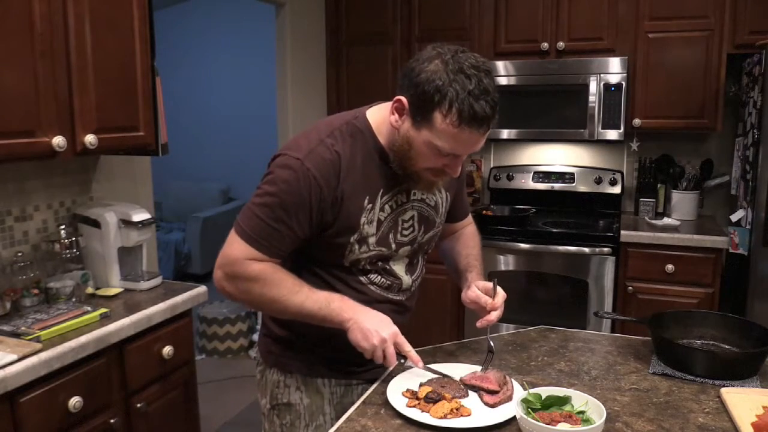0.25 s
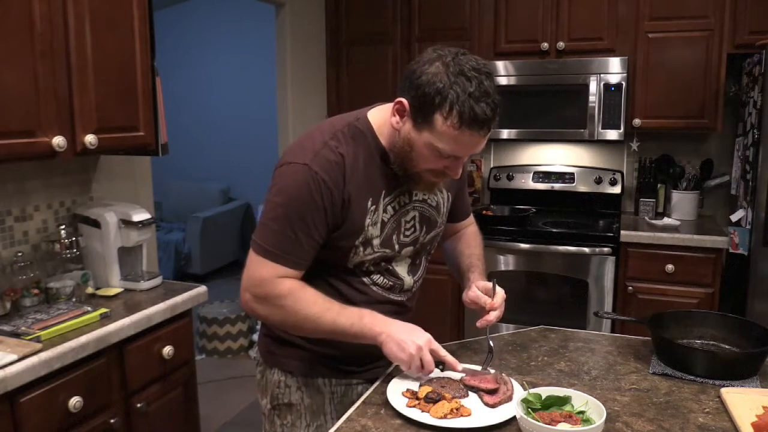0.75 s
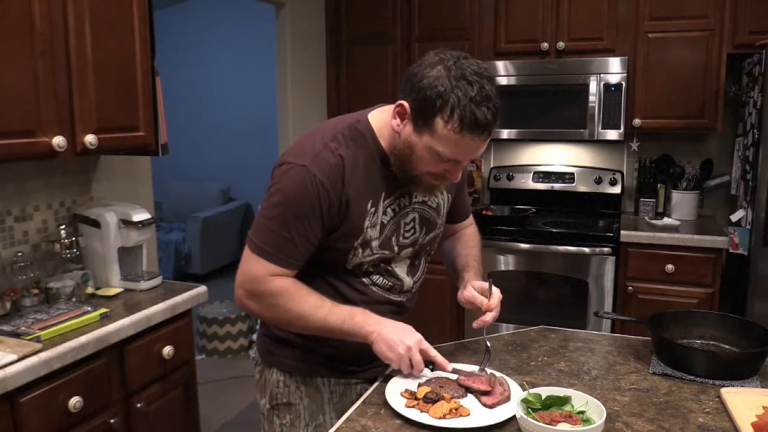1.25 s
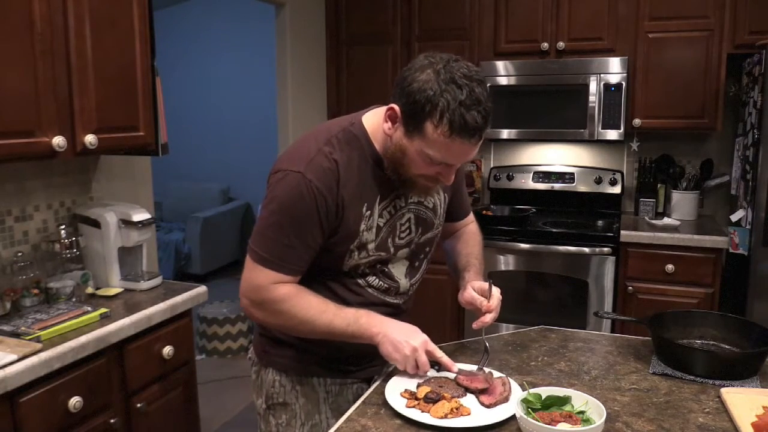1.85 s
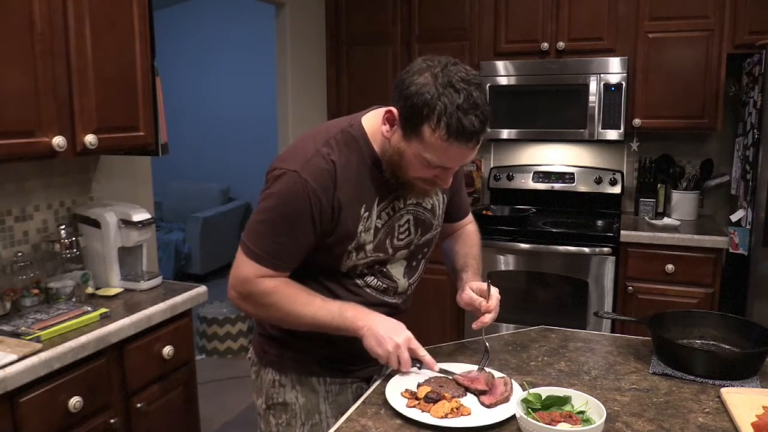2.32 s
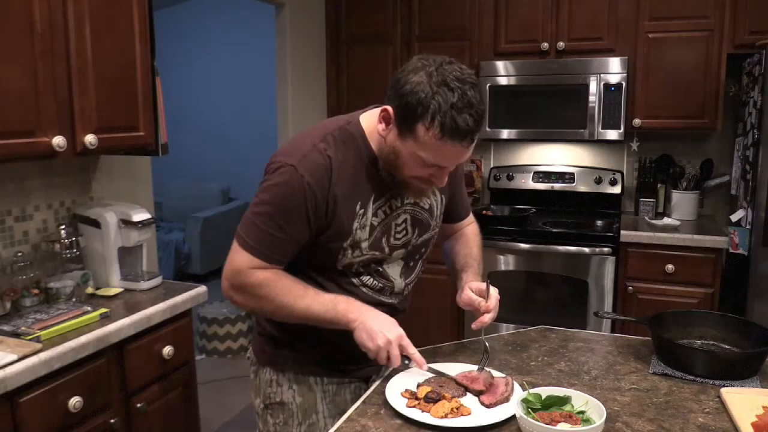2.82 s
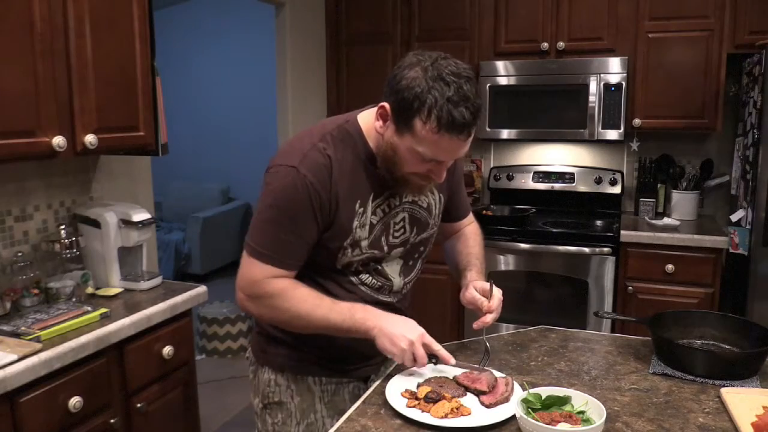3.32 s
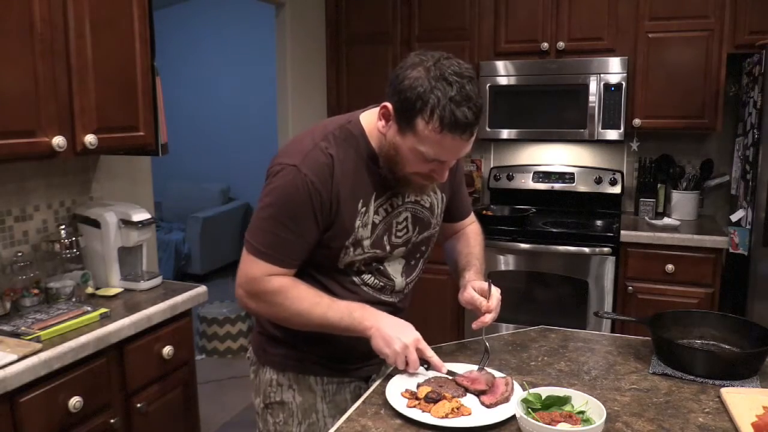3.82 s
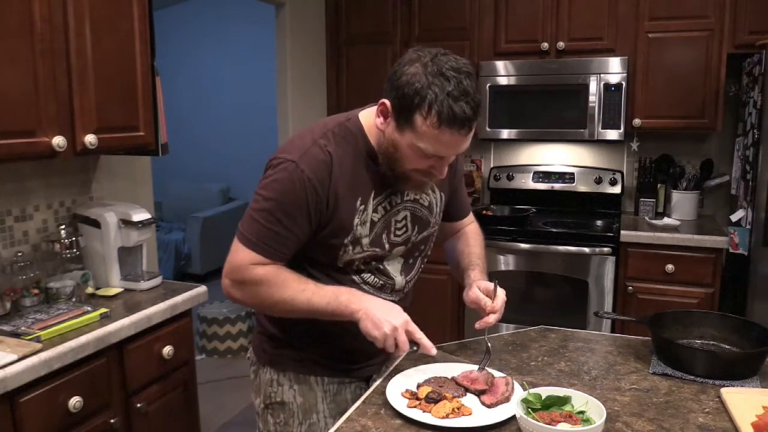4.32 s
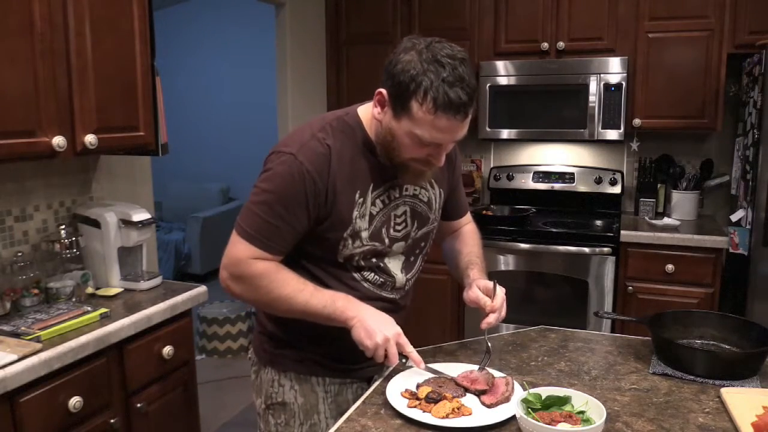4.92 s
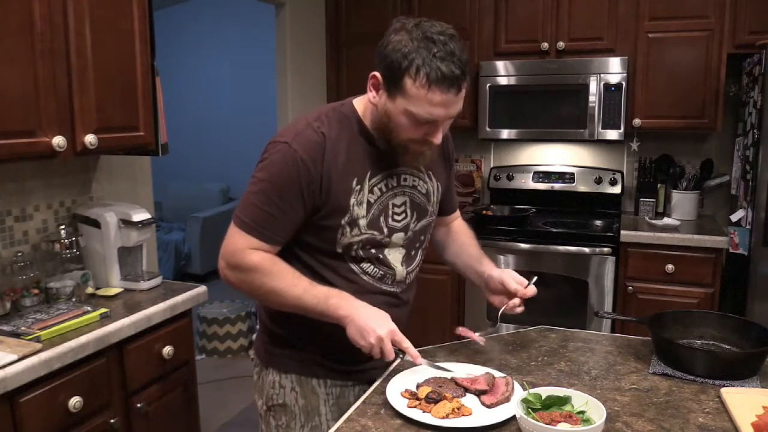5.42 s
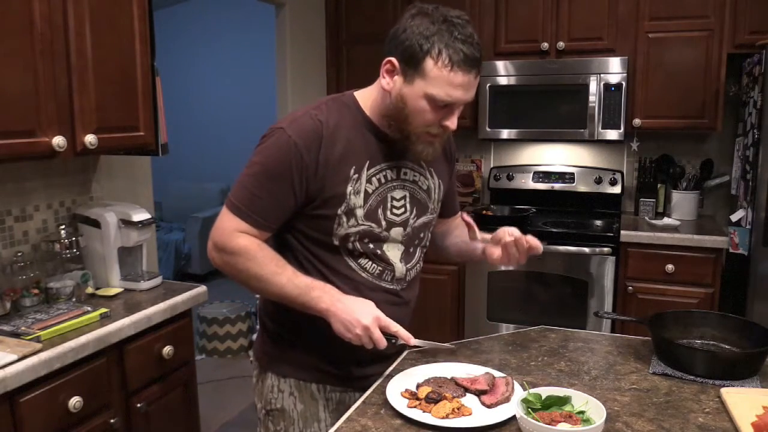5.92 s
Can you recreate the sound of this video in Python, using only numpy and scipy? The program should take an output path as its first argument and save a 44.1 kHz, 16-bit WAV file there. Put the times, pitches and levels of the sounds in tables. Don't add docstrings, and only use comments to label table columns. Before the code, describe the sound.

Close to the microphone, a serrated knife saws meat on a ceramic plate in short, soft rasps while the plate knocks dully on a stone counter. A rapid, loud chatter of ringing clinks breaks out just after two seconds, then smaller bursts follow later. Faint fork ticks and snapping fibres come between. Hard kitchen walls give a short echo over refrigerator hum and hiss.

```python
import sys
import numpy as np
from scipy import signal
from scipy.fft import rfft, irfft
from scipy.io import wavfile
from scipy.ndimage import uniform_filter1d

SR = 44100
rng = np.random.default_rng(int(sys.argv[2]) if len(sys.argv) > 2 else 0)


def gain_from_decibels(decibels):
    exponent = np.asarray(decibels, float) / 20
    return 10 ** exponent


def wrap_up_sound(samples):
    columns = np.atleast_2d(samples).T
    tamed = np.clip(columns, -1, 1)
    steps = np.round(tamed * 32767).astype(np.int16)
    wavfile.write(sys.argv[1], SR, steps)


N = 271597


def evened(x):
    return x / np.sqrt(np.mean(x ** 2) + 1e-20)


def read(points, hz):
    point_hz, value = np.transpose(points)
    return np.interp(np.log(hz + 1), np.log(point_hz + 1), value)


def filtered(points, x):
    hz = np.fft.rfftfreq(len(x), 1 / SR)
    return evened(irfft(rfft(x) * gain_from_decibels(read(points, hz)), len(x)))


def shaped(points, size):
    return filtered(points, rng.standard_normal(size))


def ring(modes, spread_db, rise_s, size=5000):
    hz, width, db = np.transpose(modes)[:, :, None]
    t = np.arange(size) / SR
    share, phase = rng.standard_normal((2, len(modes), 1))
    decay = np.exp(-np.pi * width * t)
    waves = gain_from_decibels(db + spread_db * share) * decay * np.sin(2 * np.pi * hz * t + 1.03 * phase)
    sound = waves.sum(0) * (1 - np.exp(-t / rise_s))
    return sound / abs(sound).max()


def add(mix, s, sound):
    part = mix[round(s * SR):][:len(sound)]
    part += sound[:len(part)]


# (time [s], peak [dB], rim
# [dB], plate-on-counter body [dB])
HARD_CONTACTS = [(2.1595, -8, -2.5, -8.5), (2.169, -10, -5, -8), (2.1805, -8, -3, -14.5), (2.193, -5, -3, -10),
                 (2.201, -20, -23, -18), (2.2103, -4, -4.5, -14.5), (2.219, -19, -19, 1), (2.2301, -17, -28, -3),
                 (2.2823, -7.5, -3.5, -10.5), (2.2959, -6.5, -10, -9), (2.3037, -10, -7, -8.5),
                 (2.3193, -6.5, -3.5, -9.5), (2.3406, -19, -23.5, -7), (2.42, -31.5, -12, 2),
                 (2.455, -37.5, -10, -1),
                 (3.621, -35, 5, -10), (3.6376, -16, -1, -9.5), (3.6525, -8, -2.5, -7), (3.665, -11, -25, -9),
           (3.6741, -18.5, -14, 0.5), (3.6978, -23.5, -17, 0.5), (3.715, -30.5, -19, 4),
           (4.6078, -5, 3, -12.5), (4.6289, -10, -14, -8), (4.6637, -22, -14, -6),
           (4.6883, -12.5, 0.5, -14), (4.7161, -11, 0.5, -8.5), (4.7379, -15.5, -20, -6),
           (4.797, -24.5, -26, -6)]
# (time [s], peak [dB], rim [dB], blade ring [dB])
TOUCHES = [(0.1203, -31, -15, -9), (0.2894, -21.5, -2, -16), (1.08, -36, 2, 8.5), (1.1, -27, -17, -7),
           (1.4538, -32, -3, -15), (1.494, -30, 0, 2), (1.9378, -32, -12, -2), (2.0246, -28.5, -3, -4),
           (2.892, -31.5, -11, 1.5), (2.8998, -33, 3, -12), (3.969, -21, -5.5, -1.5),
           (4.0318, -27, 3.5, -12), (4.0543, -34.5, -7, 6), (4.775, -20, 0, -6), (5.3524, -34, -1, 0),
           (5.3572, -33.5, 5, 1), (5.3807, -36, -8, -14), (5.4228, -40, -8, -2)]
SPELL_ENDS = (2.26, 2.5, 4.0, 4.62)
CUTLERY_DB = (-12.5, -8.5, -10.5, -3, -8.5, -7)
# (hard [dB/dB], touch [dB/dB])
CUTLERY_PER_RIM = (0.39, .4)


def contacts():
    found = []
    for s, db, rim_db, body_db in HARD_CONTACTS:
        spell = np.searchsorted(SPELL_ENDS, s)
        cutlery_db = CUTLERY_DB[spell] + CUTLERY_PER_RIM[0] * rim_db
        blade_db = -29 - 0.76 * db
        found.append((s, db, rim_db, cutlery_db, body_db, blade_db))
    for s, db, rim_db, blade_db in TOUCHES:
        cutlery_db = CUTLERY_DB[-1] + CUTLERY_PER_RIM[1] * rim_db
        found.append((s, db, rim_db, cutlery_db, -6, blade_db))
    return found


# (frequency [Hz], width [Hz], level [dB])
PLATE = [(2095, 19, -15.5), (2515, 65, -6), (2620, 86, -7), (2798, 50, -6), (2893, 55, -4), (2988, 44, -1),
         (3075, 44, -0.5), (3133, 30, -1.5), (3186, 49, 0), (3302, 28, -6.5), (3395, 47, -5),
         (3560, 36, -7), (3610, 25, -16), (3970, 85, -11)]
RIM = [(4473, 72, -5), (4750, 110, -11), (4900, 270, -20), (5230, 150, 2), (5370, 84, 2.5),
       (5180, 150, -12), (5670, 120, -1.5), (5870, 270, -21), (6280, 100, -7.5)]
CUTLERY = [(7730, 81, -0.5), (8170, 90, -8), (8730, 85, -19), (8700, 130, -6.5), (8910, 175, -3),
           (9250, 110, -1.5), (10820, 130, -6), (11160, 99, -5), (12400, 250, -4), (14500, 220, -14),
           (14230, 130, -5.5), (16500, 460, -30)]
BODY = [(395, 59, -4.5), (435, 40, -9), (509, 75, 5), (566, 140, -4.5), (636, 49.4, 0), (692, 130, 9.5),
        (828, 64, -1.5), (942, 22.2, -7), (1008, 44, -1.5), (1111, 55, -4.5)]
BLADE = [(1498, 224, 1), (1590, 85, 1.5), (1662, 40, -4.5), (1873, 160, 5)]
# (frequency [Hz], density [dB per Hz])
TICK = [(1500, -37), (2500, -4), (4000, -1), (7000, 9), (11000, 11), (15500, -18)]
CRACK = [(900, -17), (1400, -1), (2200, -16.5), (2700, 11), (3400, 12), (4200, -1.5), (5600, -2.5),
         (9000, -19)]


def clinks():
    out, t = np.zeros(N), np.arange(5000) / SR
    for s, db, rim_db, cutlery_db, body_db, blade_db in contacts():
        held = [1, 1 + 0.031 * max(-7 - db, 0), 1]
        tick = shaped(TICK, 5000) * np.exp(-t / 0.0016)
        crack = shaped(CRACK, 5000) * np.exp(-t / 0.0038) * (1 - np.exp(-t / 0.00017))
        sound = ring(np.multiply(PLATE, held), 1.8, 0.0007)
        sound = sound + gain_from_decibels(rim_db) * ring(np.multiply(RIM, held), 2, 0.0004)
        sound = sound + gain_from_decibels(-7 + 0.37 * rim_db) * crack
        cutlery = ring(np.multiply(CUTLERY, held), 2.2, 0.0004)
        sound = sound + gain_from_decibels(cutlery_db) * (cutlery + gain_from_decibels(-10) * tick)
        sound = sound + gain_from_decibels(body_db) * ring(BODY, 1.9, 0.0029)
        sound = sound + gain_from_decibels(blade_db) * ring(BLADE, 4.7, 0.0012)
        add(out, s, gain_from_decibels(db + 0.5) * sound)
    return out


# (time [s], peak [dB])
TINES = [
    (2.583, -29),
    (3.7199, -22.5),
    (3.8694, -28),
    (4.0464, -34),
    (4.0746, -22),
]


def tine_ticks():
    out, t = np.zeros(N), np.arange(5000) / SR
    for s, db in TINES:
        tick = shaped([(6000, -40), (8500, 3), (12000, -3), (14000, -30)], 5000) * np.exp(-t / 0.0017)
        add(out, s, gain_from_decibels(db - 11.5) * tick)
    return out


# (time [s], peak [dB])
SNAPS = [
    (5.351, -25),
    (4.8, -34),
    (5.3585, -20),
    (5.3815, -20.5),
    (9.4, -31),
    (2.9, -18),
    (1.938, -26),
]


def fibre_snaps():
    out, t = np.zeros(N), np.arange(5000) / SR
    for s, db in SNAPS:
        snap = shaped([(900, -30), (1500, 0), (7200, -5), (8500, -35)], 5000) * np.exp(-t / 0.00043)
        add(out, s, gain_from_decibels(db - 3) * snap)
    return out


# (frequency [Hz], density [dB per Hz])
RASP = [(1100, -70), (1500, 6), (2200, 4), (2800, 6.5), (3700, 2), (5400, -3.5), (7000, -13), (14000, -22)]
RUB = [(200, -12), (330, 7.5), (420, -0.5), (600, 1.5), (900, -3), (1200, -12), (1500, -58)]
# (start [s], length [s], level [dB])
SKIDS = [
    (2.118, 0.0395, -26),
    (4.626, 0.0192, -16),
]
# (start [s], length [s], rasp [dB], blade [dB], rub [dB])
STROKES = [(0.105, 0.22, -45, -39, -39), (0.265, .1, -38, -45, -44), (.3, 0.39, -48, -39.5, -43),
           (0.854, 0.18, -27, -37, -22), (1.033, 0.15, -29, -32, -31.5), (1.42, 0.17, -38.5, -46, -38),
           (1.594, 0.08, -31.5, -36, -32), (1.627, 0.093, -26, -37, -26), (1.756, 0.13, -27, -30.5, -32),
           (1.943, 0.1, -34, -40, -36), (2.385, 0.1, -42, -42.5, -36), (2.794, 0.11, -41.5, -44, -47),
           (2.87, 0.1, -38, -37, -35.5), (3.735, 0.1, -47, -43, -37), (3.825, 0.14, -39.5, -42.5, -37),
           (3.973, 0.098, -37, -47, -34), (4.01, 0.19, -39, -38.5, -34), (4.79, 0.18, -45, -43.5, -39.5),
           (5.349, 0.047, -41, -49, -53), (5.41, 0.1, -54, -48, -41.5)]


def sawing():
    strength = gain_from_decibels(2.5 * np.minimum(rng.exponential(1, N), 3))
    caught = rng.random(N) < 3000 / SR
    slips = strength * caught * rng.choice([-1, 1], N)
    rasp, rub = filtered(RASP, slips), filtered(RUB, slips)
    plate, blade, cutlery = (evened(signal.oaconvolve(slips, ring(modes, 1, 0.0011))[:N])
                             for modes in (PLATE + RIM, BLADE, CUTLERY))
    skid = plate + 0.11 * cutlery + 0.47 * rub
    cut = rasp + 0.057 * plate
    out = np.zeros(N)
    for s, length, db in SKIDS:
        a, size = round(s * SR), round(length * SR)
        out[a:a + size] += gain_from_decibels(db) * signal.windows.tukey(size, 0.28) * skid[a:a + size]
    for s, length, *levels_db in STROKES:
        a, size = round(s * SR), round(length * SR)
        speed_db = np.interp(np.arange(size) / size, [0, 0.3, 0.3 + 0.17, 1], [-17.5, 0, 0, -17.5])
        stroke = sum(gain_from_decibels(db - 6) * part[a:a + size] for db, part in zip(levels_db, (cut, blade, rub)))
        out[a:a + size] += stroke * gain_from_decibels(speed_db) * signal.windows.tukey(size, 0.1)
    return out


# (time [s], peak [dB], boom [dB])
THUDS = [(0.247, -24, 2), (1.191, -12, -9), (1.203, -16, -0.5), (1.235, -46, -11), (1.542, -5.5, -7.5),
         (1.555, -21, -12), (1.566, -12.5, -4), (1.58, -27, -7), (1.609, -29, -8), (1.887, -28, 9.5),
         (1.937, -14.5, -6), (1.961, -18, 1.5), (2, -33, -4), (2.932, -35, -5), (2.962, -27.5, -7),
         (3.763, -20.5, -10), (4.091, -23, -9), (4.612, -19, -17), (4.72, -25, -16), (3.659, -16.5, -19),
         (2.2, -26, 2)]
# (frequency [Hz], width [Hz], level [dB])
COUNTER = [(181, 37, -0.5), (260, 34, -2), (344, 64, 8.5), (421, 97, 7), (514, 118, 10), (650, 100, -2)]
CABINET = [(62.3, 12, -8), (89, 44, 15.5), (120, 24, -1)]


def thuds():
    out = np.zeros(N)
    for s, db, boom_db in THUDS:
        knock = ring(COUNTER, 2, 0.002) + gain_from_decibels(boom_db) * ring(CABINET, 3, 0.004)
        add(out, s, gain_from_decibels(db - 2) * knock)
    return out


# (frequency [Hz], time to fall 60 dB [s])
ROOM = [(100, 0.42), (400, 0.44), (1000, 0.35), (3000, 0.44), (6000, 0.32), (15000, 0.19)]


def kitchen(x):
    taps = np.zeros(SR)
    at = np.arange(140, SR - 20, 20)
    taps[at + rng.integers(0, 20, len(at))] = rng.choice([-1., 1.], len(at))
    hz, t, z = signal.stft(taps, SR, nperseg=256)
    decay_db = -60 * t / read(ROOM, hz)[:, None]
    tail = signal.istft(z * gain_from_decibels(decay_db), SR, nperseg=256)[1]
    return signal.fftconvolve(x, tail / np.linalg.norm(tail))[:N]


# (time [s], half length [s], level [dB])
SHIFTS = [
    (0.045, .2, -27.5),
    (0.424, 0.13, -39),
    (1.213, 0.41, -47),
    (1.905, 0.15, -32),
    (2.25, 0.12, -48),
    (2.98, 0.086, -47),
    (3.819, .3, -55),
    (4.75, .15, -46.5),
]


def rumble():
    t = np.arange(N) / SR
    swell = gain_from_decibels(-56.5) + sum(gain_from_decibels(db) * np.exp(-((t - s) / half) ** 2) for s, half, db in SHIFTS)
    return swell * shaped([(6, -28), (12, -6), (22, 18), (32, 6), (45, -39)], N)


# (frequency [Hz], density [dB per Hz])
AIR = [(30, -30), (55, -19), (85, -17), (125, -8.5), (190, -11), (276, -8.5), (350, -17.5), (455, -12),
       (585, -21.5), (760, -22), (1020, -25), (1760, -26), (8770, -32), (16000, -38)]
# (frequency [Hz], level [dB])
HUM = [(59.2, -47), (118.4, -50.5), (237, -76), (1700, -68)]


def background():
    t = np.arange(N) / SR
    waver = evened(shaped([(.1, 10), (6, -29), (15, -54)], N))
    out = gain_from_decibels(-39) * shaped(AIR, N)
    for k, (hz, db) in enumerate(HUM):
        level = gain_from_decibels(db + 8 + 0.53 * np.roll(waver, 9000 * k))
        out = out + level * np.sin(2 * np.pi * (hz * t + rng.random()))
    return out


# (time [s], fall [s], change [dB], hold [s])
DUCKS = [
    (2.11, 0.38, -11, 0),
    (2.3, 0.23, -4.5, 0),
    (3.62, 0.058, 0.6, 0.18),
    (4.103, .1, -0.5, .35),
    (4.58, 0.0088, -3.5, 0),
    (4.59, 0.53, -0.8, .35),
]


def gain_db():
    t = np.arange(N) / SR
    rate = np.where(t < DUCKS[0][0], 0.05, 2.5)
    for s, fall, db, hold in DUCKS:
        ducked = (t >= s) & (t < s + fall + hold)
        rate = np.where(ducked, np.where(t < s + fall, db / fall, 0), rate)
    return -47.5 + 52 + np.cumsum(rate) / SR


def scene():
    heard = gain_from_decibels(gain_db())
    struck = (clinks() + tine_ticks() + fibre_snaps()) / heard
    meal = struck + (sawing() + thuds()) / heard
    mix = meal + gain_from_decibels(-5) * kitchen(meal) + rumble() / heard + background()
    side = gain_from_decibels(-28) * uniform_filter1d(struck * rng.standard_normal(N), 3)
    return np.array([mix + side, mix - side])


def roll_off(x):
    return signal.sosfilt(signal.butter(12, 16600, fs=SR, output="sos"), x)


def record(dry):
    x = np.clip(dry * gain_from_decibels(gain_db()), -1, 1)
    edge_hz, shelf_hz = 15750, 16500
    corners_hz = [0, edge_hz, edge_hz + 150, shelf_hz, shelf_hz + 150, SR / 2]
    band = signal.firwin2(801, corners_hz, [1, 1, .1, .03, 0, 0], fs=SR)
    return roll_off(signal.oaconvolve(x, band[None], "same", axes=1))


dry = scene()
out = record(dry)
wrap_up_sound(out)
```